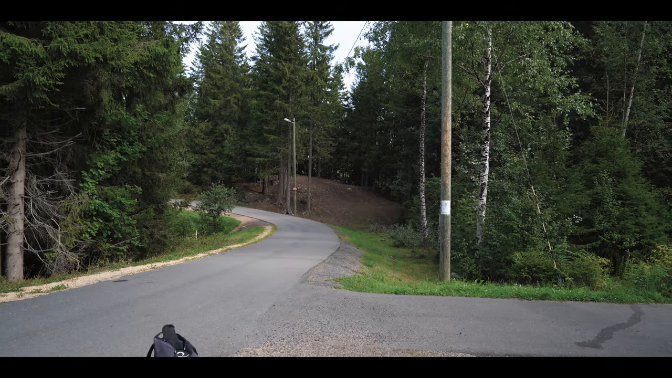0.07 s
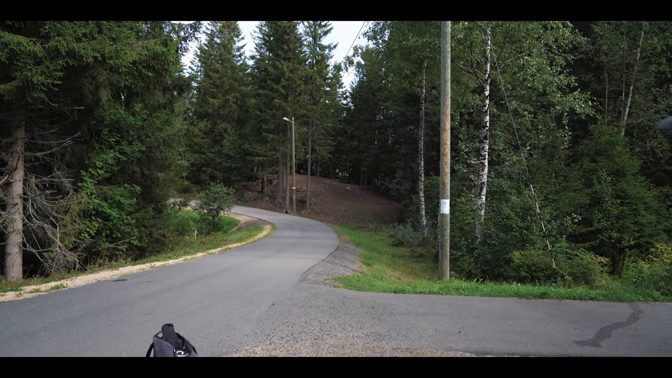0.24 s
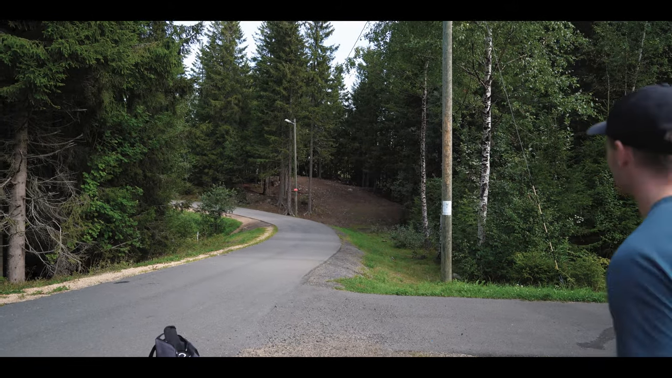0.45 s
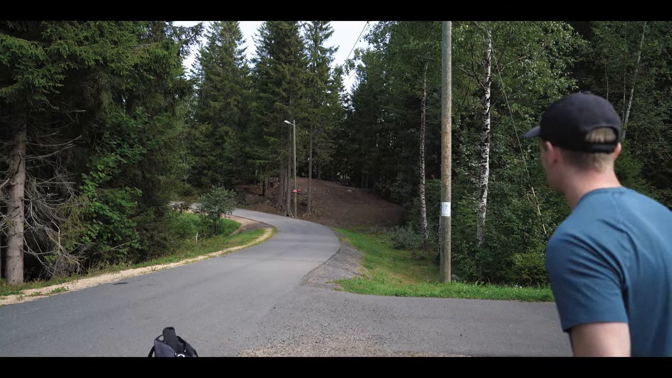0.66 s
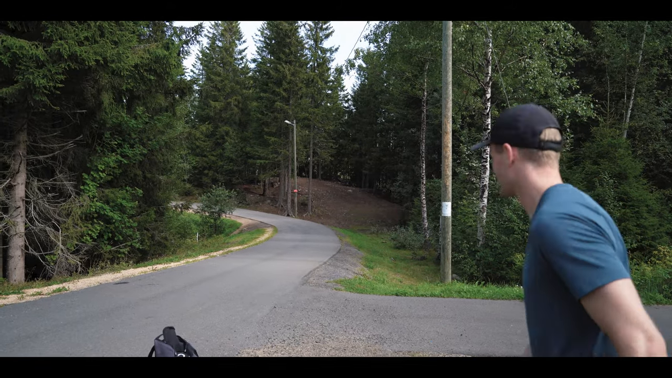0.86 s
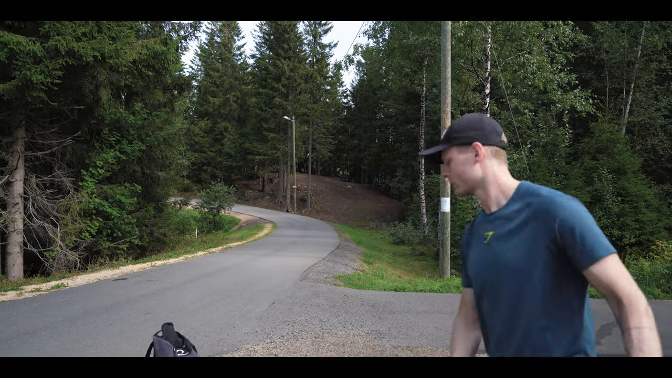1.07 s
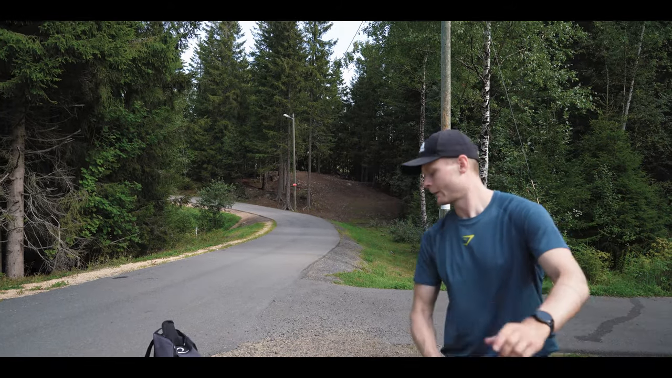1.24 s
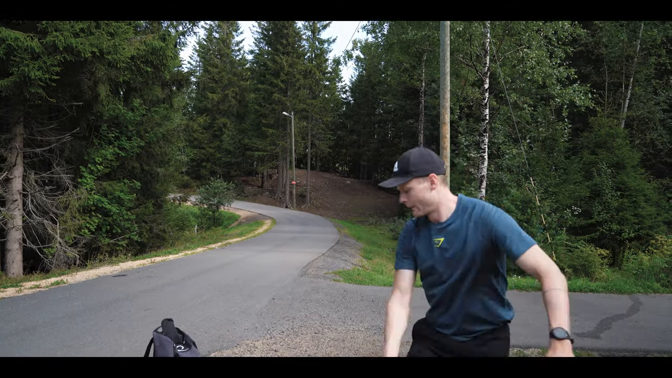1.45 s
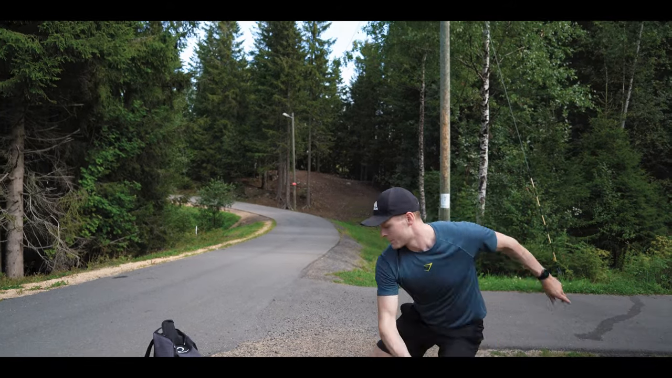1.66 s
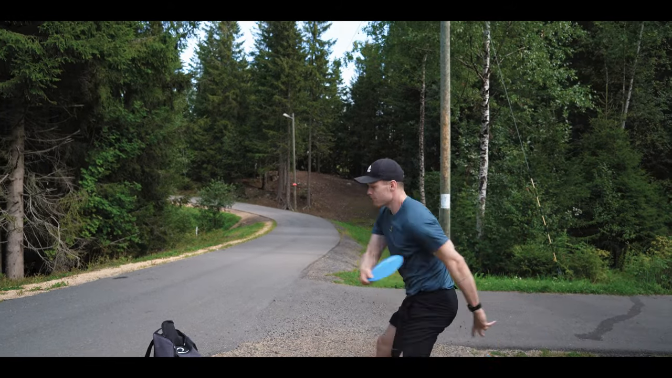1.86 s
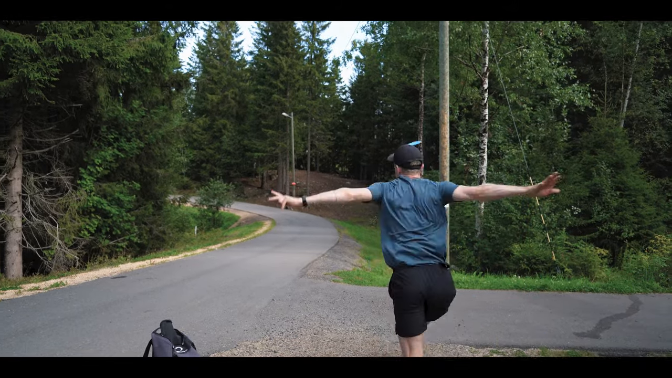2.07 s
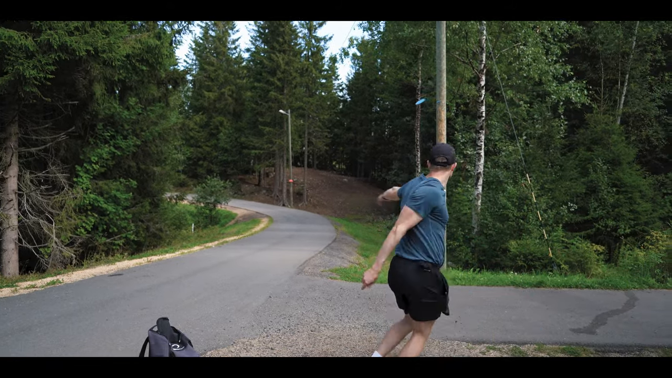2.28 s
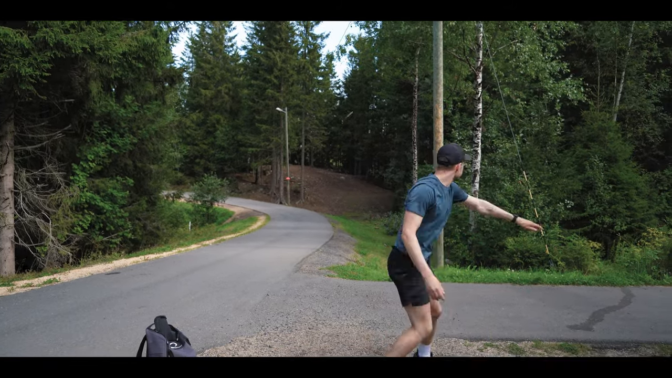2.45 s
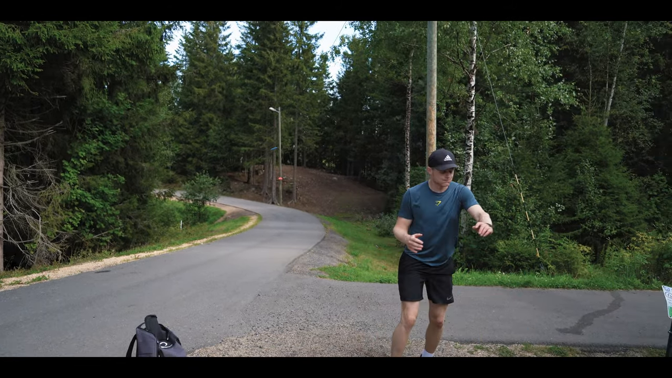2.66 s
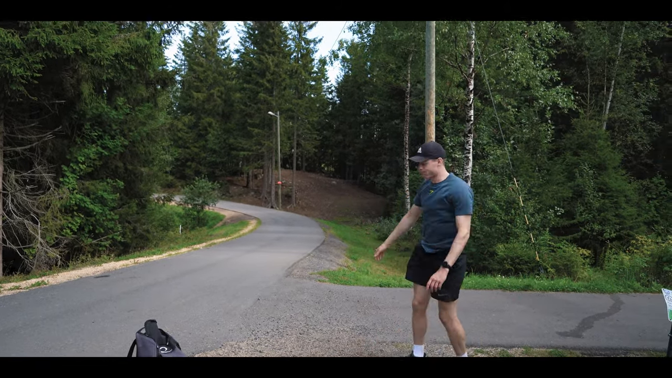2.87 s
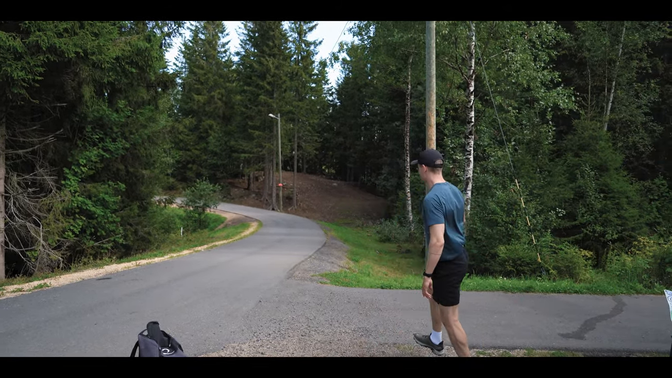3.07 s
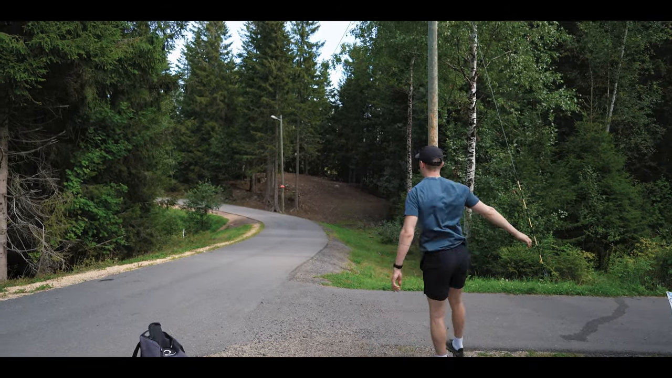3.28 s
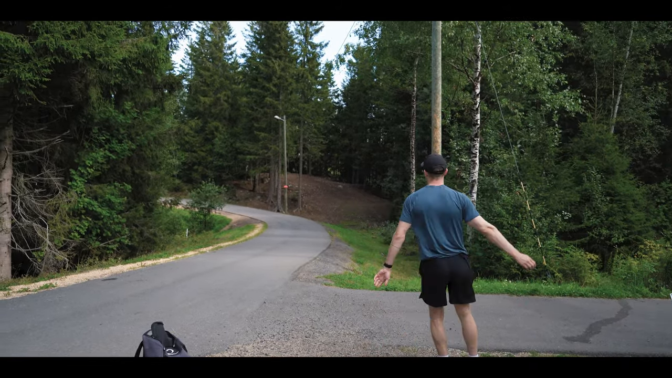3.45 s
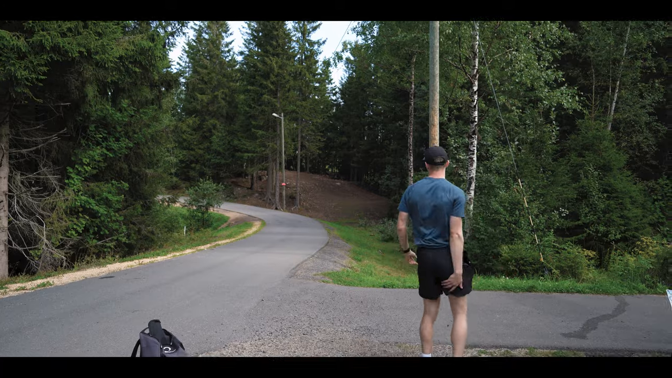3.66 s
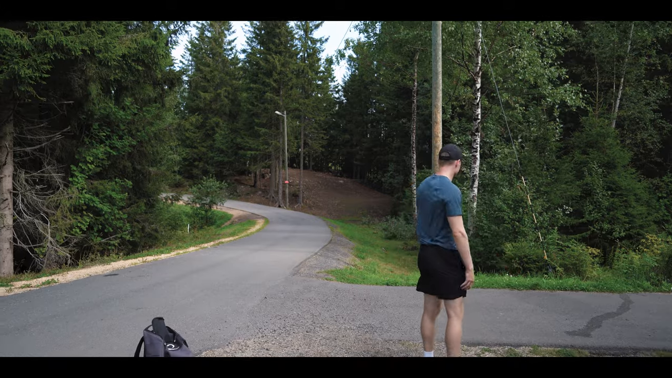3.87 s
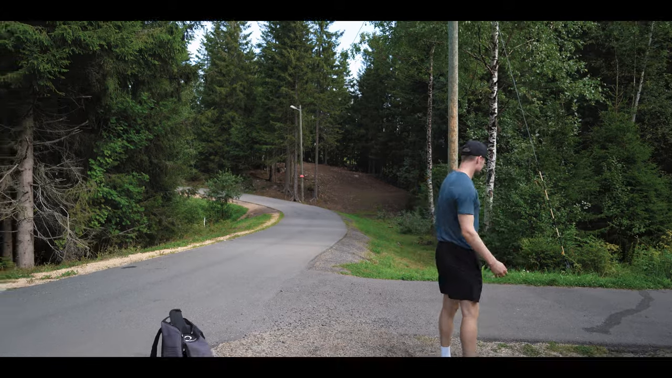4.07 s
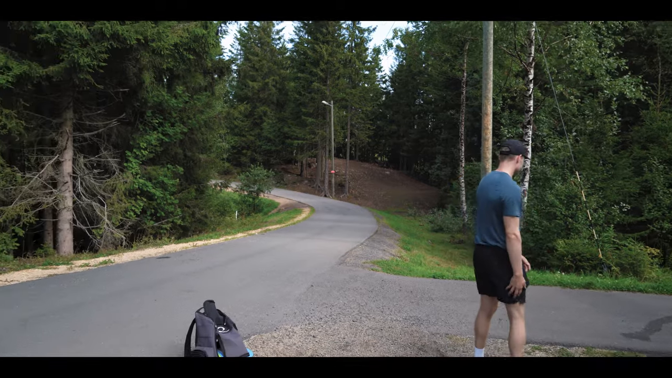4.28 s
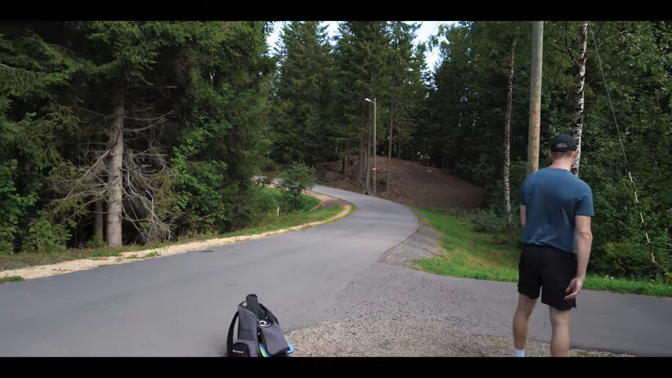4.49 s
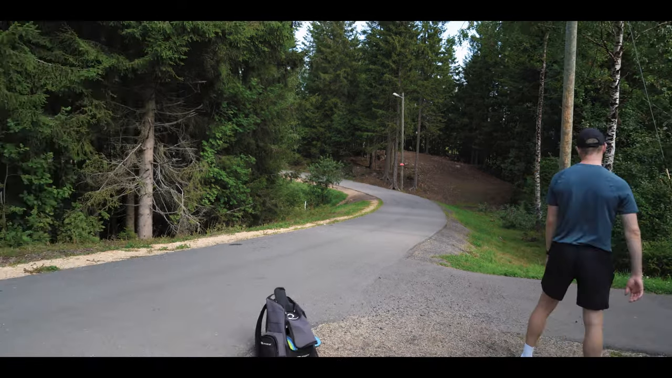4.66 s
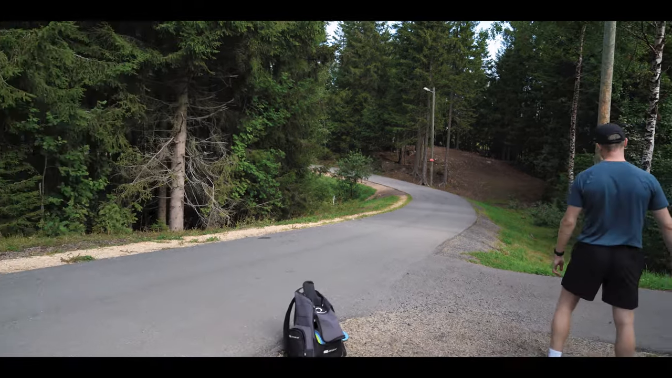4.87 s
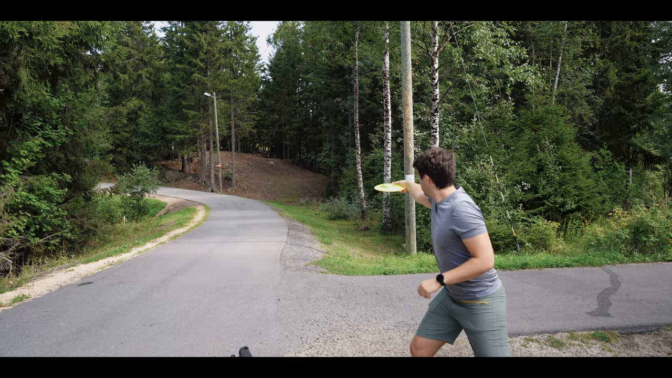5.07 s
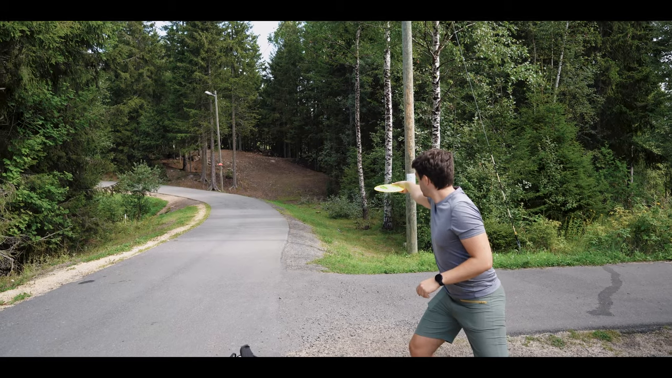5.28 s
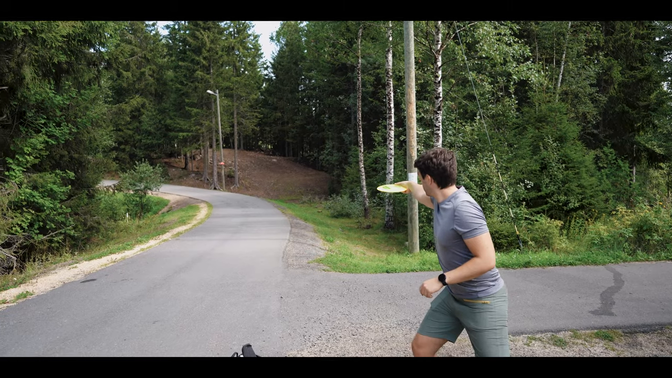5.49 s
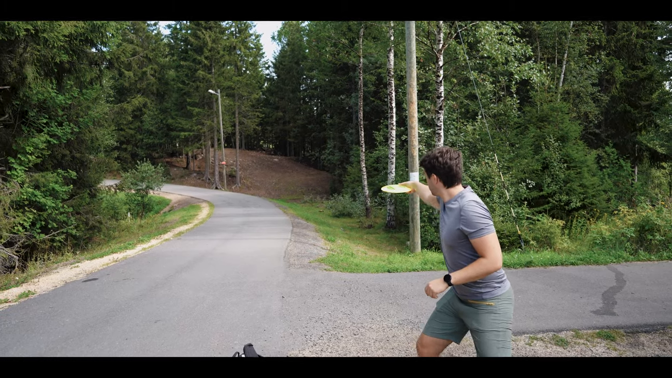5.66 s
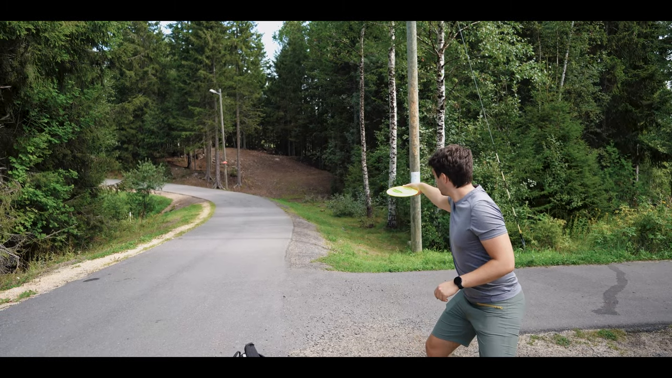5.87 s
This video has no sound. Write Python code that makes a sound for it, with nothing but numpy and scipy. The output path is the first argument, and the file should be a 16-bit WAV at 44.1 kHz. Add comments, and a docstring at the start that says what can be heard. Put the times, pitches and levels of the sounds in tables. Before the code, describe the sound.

Quiet outdoor air beside a forest and a faint falling bird whistle. A player's shoes scrape and grind loose grit, clothes swishing lightly, then a sharp slap-like crack bursts far above everything else and scatters into a short woodland reverberation. Afterwards irregular gravelly shuffles with small stone clicks slow to a halt, leaving soft air and thin, distant bird chirps. Near, dry perspective, no speech.

```python
"""Soles on gritty asphalt at a forest edge: a player steps into a disc throw, then shuffles to a stop.
Scuffs are random grain clicks under load curves, pebble pops and shoe knocks short rings, heel thuds
sagging low sines. The disc leaves with a sharp snap of ringing slaps and a noise crack; decaying noise
echoes it from the trees. Clothes swish as shaped grit; birds are gliding sines over a noise haze;
the still air is filtered noise."""
import sys
import numpy as np
from scipy import signal
from scipy.fft import rfft, irfft
from scipy.io import wavfile
from scipy.ndimage import uniform_filter1d

SR = 44100
rng = np.random.default_rng(int(sys.argv[2]) if len(sys.argv) > 2 else 0)


def put_to_file(sound):
    """Save the sound as 16-bit audio at rate SR, in the file named by the first command-line argument."""
    columns = np.atleast_2d(sound).T  # one column per channel
    safe = np.clip(columns, -1, 1)
    whole_steps = np.round(safe * 32767)
    wavfile.write(sys.argv[1], SR, whole_steps.astype(np.int16))


N = 261513
TIME = np.arange(N) / SR

# Feet landing on grit. Each row: peak time in seconds, crunch level in dB before trim,
# fade in seconds per 20 dB, sole body in dB relative to the crunch.
FOOTFALL_ROWS = [(1.436, -58, 0.02, -4), (1.809, -53.5, 0.06, 1.5), (1.897, -46.8, .07, 0),
                 (2.187, -53.5, .03, 3.5), (2.593, -45, 0.09, -5), (2.815, -43, 0.0377, -5),
                 (2.943, -53, 0.03, 0.5), (2.971, -50.5, .05, -8), (3.339, -58, 0.03, 4),
                 (3.386, -42, 0.03, -5.5), (3.798, -47.5, 0.0275, 1.5), (3.836, -50.5, .03, 2),
                 (3.975, -59.5, 0.03, 6.5), (4.286, -52, 0.05, 1.5)]
FOOTFALL_SAND_DB = -17  # relative to the crunch
LANDING_SHARE = 0.16  # rise time as a share of fade time
# A sole drags, then lifts. Each row: peak time in seconds, crunch level in dB before trim, rise and fade
# in seconds per 20 dB, sole body and sand fizz in dB relative to the crunch.
DRAG_ROWS = [(.6, -72, 0.44, .5, 1.5, -22), (1.2, -50.5, 0.08, 0.04, -3, -25),
             (1.236, -48, 0.056, .03, -4.5, -27), (1.462, -59.5, .05, 0, 2, -20),
             (1.955, -48.5, .07, 0.04, -3, -22), (2.02, -44.3, 0.1123, 0.1433, .5, -22),
             (2.121, -50, 0.0948, .06, 2.5, -14), (2.298, -57, .16, 0.35, 1.5, -16.5),
             (2.722, -47.5, 0.13, 0.025, 1, -15), (3.003, -49.5, 0.05, 0.06, -8, -12.5),
             (3.143, -56, 0.1, .021, 1, -18), (3.261, -54.5, 0.13, 0.07, -7, -11.5),
             (3.401, -43, 0.03, 0.01, -3.5, -16), (3.436, -52, 0.08, 0.02, -4, -18),
             (3.629, -44.5, 0.05, 0.0438, -1, -19.5), (3.699, -51, 0.07, 0.11, -2.5, -16),
             (3.78, -54.5, 0.03, .03, -3.5, -19), (4.025, -55, .055, 0.0344, 2.5, -13),
             (4.322, -55, 0.03, .02, -3, -22), (4.377, -50, 0.0547, 0.02, -3.5, -13),
             (4.44, -66, 0.14, .1, 1, -22)]
# Light weight shifts between steps. Each row: time in seconds, crunch level in dB before trim.
SHUFFLE_LEVEL = [(1.05, -87.5), (1.3, -66), (1.7, -66), (2.2, -70), (2.6, -63.5), (2.85, -64), (3.3, -72),
                 (3.75, -67), (3.95, -73.5), (4.15, -83), (4.45, -73), (5, -88)]
SHUFFLE_BODY_DB, SHUFFLE_SAND_DB = -6, -10  # relative to the crunch
# Sand sprays as the player spins on the planted foot; level before the sand trims.
PIVOT_S, PIVOT_WIDTH_S, PIVOT_DB = 2.006, 0.12, -58.5
SLOW_SAND_DB = 0.7  # slow steps crack more sand for the same load
# Sole body spectrum, also used by the disc flutter. Each row: frequency in Hz, relative dB per Hz.
BODY_SPECTRUM = [(60, -26), (160, -3.5), (260, -2), (420, 0.5), (600, -1.5), (850, -8.5), (1300, -25),
                 (3000, -60.5)]
# Crunch of crushed grains. Each row: frequency in Hz, relative dB per Hz.
CRUNCH_SPECTRUM = [(350, -30.5), (750, -6.5), (1100, 3), (1700, -1.5), (2700, -6.5), (3400, -4.8),
                   (4000, -4.8), (4800, -16.5), (7000, -27), (12000, -50)]
# Sand under the fast run-up. Each row: frequency in Hz, relative dB per Hz.
SPRAY_SPECTRUM = [(2500, -35), (4800, -4), (6000, -2), (8000, -1.5), (11000, -4.5), (13000, -8.5),
                  (16000, -16)]
# Sand under slow steps. Each row: frequency in Hz, relative dB per Hz.
FIZZ_SPECTRUM = [(2500, -35), (4800, -4), (6000, -2.5), (8000, -2.5), (11000, -4.5), (13000, -3.7),
                 (16000, -8)]

# Stones popping and shoe edges knocking, loud and faint. Each row: start in seconds,
# envelope peak in dB before chatter, ring in Hz, rise in cycles of the ring.
POP_ROWS = [(.524, -53.5, 2200, .5), (.574, -51, 1800, .5), (.7027, -45.5, 1200, .45),
            (.7035, -45, 450, .55), (1.185, -42, 6200, 1.2), (1.222, -33, 1700, .5), (1.231, -41, 1400, .6),
            (1.2365, -40, 1200, .6), (1.276, -48, 1300, .6), (1.317, -49, 1300, 1.2),
            (1.4925, -31.5, 2950, .6), (1.4939, -31.5, 940, .6), (1.4965, -36.5, 406, .6),
            (1.8055, -37, 320, .45), (1.8058, -43, 1800, .5), (1.816, -45, 9000, .6),
            (1.812, -41, 1000, .6), (1.824, -45, 1500, .6), (1.8955, -40, 1300, .5), (1.909, -40, 1200, .6),
            (1.934, -38, 700, .6), (1.98, -39, 1300, .6), (1.998, -37, 1600, .6), (2.014, -36, 500, .6),
            (2.027, -26, 750, .5), (2.0275, -33, 3700, 1.2), (2.041, -34, 550, .6), (2.059, -36, 620, .6),
            (2.128, -37, 1200, .6), (2.158, -42, 1100, .6), (2.1865, -44, 1110, .6),
            (2.589, -39, 3600, 1.2), (2.594, -41, 4300, 1), (2.598, -32, 3970, 1.8), (2.631, -41, 5800, .6),
            (2.6825, -39, 300, .35), (2.707, -36, 600, .4), (2.71, -42, 10000, 1), (2.711, -41, 200, .45),
            (2.72, -35, 1100, .6), (2.7235, -38, 700, .6), (2.8055, -40, 3600, 2),
            (2.8124, -31.5, 1150, .5), (2.814, -33, 1300, .6), (2.8157, -36, 3900, 1.2),
            (2.817, -33, 1000, .6), (2.828, -33, 3700, 2), (2.8345, -43, 3400, 3), (2.881, -46, 6000, .55),
            (2.882, -48, 328, .6), (2.943, -40.5, 1400, .6), (2.9695, -38, 2300, .6),
            (2.989, -38, 3500, 1.2), (2.997, -36, 2300, .8), (3.002, -37, 3400, 1.2),
            (3.0157, -30, 1230, .45), (3.041, -45, 12500, 1.2), (3.051, -45, 3500, 1.8),
            (3.088, -36, 2410, .65), (3.121, -45, 550, .6), (3.145, -41, 1100, .6), (3.162, -46, 4200, 1),
            (3.1755, -30, 12000, .8), (3.202, -34.5, 1490, .6), (3.2295, -30, 2840, .7),
            (3.269, -44, 2210, .6), (3.2745, -45, 8000, .6), (3.35, -42.5, 500, .6),
            (3.3815, -36, 1300, .6), (3.385, -39, 1900, .6), (3.3915, -32, 1150, .6),
            (3.401, -36.5, 950, .6), (3.4305, -35, 1497, .6), (3.4437, -42.5, 7500, .7),
            (3.4735, -42, 11000, .65), (3.518, -46, 9500, .8), (3.6135, -37, 1700, .6),
            (3.6223, -41, 10500, .6), (3.6245, -30.5, 746, .6), (3.629, -33, 2000, .6),
            (3.6339, -31, 1100, .5), (3.636, -32, 2000, .9), (3.65, -38, 1700, .6),
            (3.651, -45, 13000, 1.8), (3.674, -37, 600, .6), (3.6945, -40, 2100, .6),
            (3.7155, -42, 1600, .6), (3.77, -35, 1190, .5), (3.7954, -34, 1600, .9),
            (3.799, -34.5, 607, .9), (3.8332, -33, 1500, .6), (3.8436, -28, 1200, .45),
            (3.844, -32, 9700, .7), (3.855, -41, 2200, .6), (4.0283, -37.5, 1696, 1.1),
            (4.2878, -47, 3600, 1), (4.29, -40, 8040, .7), (4.299, -42, 900, .6), (4.304, -43, 3000, .6),
            (4.3047, -44, 469, .6), (4.373, -43, 1300, .6), (4.3785, -41, 900, .6), (4.3922, -34, 430, .6),
            (4.393, -35.5, 850, .6)]
TICK_DB, TICK_HZ, TICK_CYCLES = -7, 3400, 0.45  # hard edge that starts each lower-pitched pop
TICK_SOFT_DB_PER_OCTAVE = 3.5  # the sole muffles large stones: tick loss per octave of ring below TICK_HZ

# Weight landing. Each row: start in seconds, envelope peak in dB before judder, first pitch in Hz,
# rise in seconds.
THUD_ROWS = [(1.492, -50, 190, .01), (1.52, -57.5, 85.6, .022), (1.803, -43, 72, 0.022),
             (1.88, -48.5, 68, 0.037), (2.025, -44.5, 135, 0.02), (2.088, -47, 135, .017),
             (2.135, -50, 95.3, 0.026), (2.185, -53, 62, .02)]
THUD_SAG = 0.6  # final pitch as a share of the first

# Clothes sweeping past. Each row: peak time in seconds, level in dB, half width in seconds.
SWISH_ROWS = [(1.208, -63, 0.057), (1.45, -71.5, 0.056), (1.66, -73, .13), (2.01, -62, 0.11)]
# Cloth rub. Each row: frequency in Hz, relative dB per Hz.
CLOTH_SPECTRUM = [(800, -19.5), (2500, -5), (4200, 0), (7000, -2), (9000, -11), (16000, -24)]

# Quick slaps as the rim tears out of the fingers, bright and dull mixed, mostly lower towards the end.
# Each row: start in seconds, envelope peak in dB before the high-pass, ring in Hz, rise in milliseconds.
SLAP_ROWS = [(2.3622, -4.5, 1960, .98), (2.3622, -15.5, 750, 0.57), (2.3625, -22, 2300, 1.5),
             (2.363, -24, 3700, 1.1), (2.36393, -6, 1505, 1.12), (2.366, -9.5, 607, 0.63),
             (2.36787, -9.5, 1193, 0.87), (2.3695, -20, 800, 2.3), (2.3732, -16, 440, 3.2),
             (2.366, -27, 328, 6.5)]
SNAP_S = SLAP_ROWS[0][0]
# Crack of skin on plastic. Each row: frequency in Hz, relative dB per Hz.
CRACK_SPECTRUM = [(300, -40), (1500, -9), (2300, 0), (3000, 0), (4000, -2.5), (5000, -12), (6500, -16.5),
                  (8000, -24), (10000, -26), (16000, -36)]
GROUND_ECHO_S, GROUND_ECHO_DB = .0024, -2.5  # the asphalt throws the crack back

# Snap as it spreads into the trees. Each row: frequency in Hz, relative dB per Hz.
ECHO_SPECTRUM = [(60, -18), (170, -4), (300, 1), (450, 2.5), (700, 2), (1100, -0.5), (2000, -3),
                 (2700, -8.7), (3900, -8.7), (5200, -23), (8000, -31.5), (16000, -39)]
# Forest ring. Each row: frequency in Hz, 60 dB decay time in seconds.
FOREST_T60_S = [(150, 0.57), (450, .5), (900, .68), (2000, 0.63), (4000, .6), (14000, .62)]
# Late return from the far slope. Each row: frequency in Hz, relative dB per Hz.
HILL_SPECTRUM = [(200, -22), (500, -6), (800, 0), (1300, 0), (2000, -3), (2700, -14), (5000, -35)]
HILL_DELAY_S, HILL_WIDTH_S, HILL_DB = .35, .13, -54

# Nearer birds' notes. Each row: start in seconds, length in seconds, level in dB before the song trim,
# first, middle and last pitch in Hz.
BIRD_NOTES = [(1.348, .022, -64.5, 1670, 1760, 1740), (4.972, .04, -75, 3850, 4300, 3900),
              (5.003, .07, -75, 2750, 3130, 3150), (5.025, .05, -77, 2750, 2820, 2850),
              (5.11, .09, -79, 2900, 3000, 3050), (5.198, .022, -70, 4700, 3700, 2750),
              (5.218, .042, -78, 2750, 2560, 2650), (5.256, .048, -68.5, 2660, 3500, 4950),
              (5.345, .06, -73, 3800, 4120, 4020), (5.432, .03, -69.5, 2950, 3450, 3890),
              (5.455, .039, -69.5, 3900, 3350, 2600), (5.5, .19, -81, 3780, 3740, 3720),
              (5.56, .11, -82, 3020, 2990, 3000), (5.665, .045, -72, 3147, 3280, 3430),
              (5.68, .055, -75, 3000, 3000, 3020), (5.703, .05, -71.5, 3500, 3850, 3880),
              (5.78, .15, -80, 3850, 3830, 3780)]
# Quick twitter in mid-song; level before the song trim, range as a share of the centre pitch.
TWITTER_SPAN_S, TWITTER_PER_S, TWITTER_NOTE_S = (5.3, 5.42), 70, .02
TWITTER_DB, TWITTER_HZ, TWITTER_RANGE = -77.5, 4400, 0.2
# Falling whistle. Each row: time in seconds, pitch in Hz, level in dB.
WHISTLE_GLIDE = [(.74, 4250, -86), (.77, 4190, -75.5), (.84, 4070, -77), (.87, 3920, -82),
                 (.9, 3930, -77.5), (.955, 3850, -87), (1.0, 3400, -78), (1.06, 3160, -79),
                 (1.09, 3130, -88)]
# Far birds. Each row: frequency in Hz, relative dB per Hz.
CHORUS_SPECTRUM = [(1500, -45), (2500, -12), (3000, -1), (3800, 0), (4500, -4), (5400, -16), (7000, -45)]
CHORUS_S, CHORUS_WIDTH_S, CHORUS_DB = 5.45, .4, -84.5

# Outdoor air level. Each row: time in seconds, level in dB.
AIR_LEVEL_DB = [(0, -68.5), (.3, -67.5), (.5, -66.5), (1.05, -69), (4.15, -68.5), (4.5, -66.5), (4.93, -68),
                (5.05, -65)]
# Wash from the trees. Each row: frequency in Hz, relative dB per Hz.
AIR_SPECTRUM = [(20, -7), (70, -3), (120, -3), (220, 1.5), (400, 0.5), (560, -4), (850, -5.5),
                (1400, -11.5), (2400, -20.5), (3900, -19.5), (5400, -28.5), (8000, -31.5), (12500, -33),
                (16000, -44)]
# Low soft noise, mostly 200-450 Hz, swelling around 4.6 s. Each row: frequency in Hz, relative dB per Hz.
LOW_NOISE_SPECTRUM = [(80, -28), (150, -12), (220, 3), (300, 0), (420, -1.5), (650, -18), (1400, -13.5),
                      (2300, -18.5), (4000, -25), (6000, -45)]
LOW_NOISE_S, LOW_NOISE_WIDTH_S, LOW_NOISE_DB = 4.62, 0.26, -64.5

EDGE_HZ = 16050


def scuffs():
    """Grains crush under the loaded sole: they thump the rubber, crunch, and spray fine sand."""
    loads = []
    for s, db, fade_s, body_db in FOOTFALL_ROWS:
        loads.append((pressure(s, db, LANDING_SHARE * fade_s, fade_s), body_db, FOOTFALL_SAND_DB))
    for *stroke, body_db, sand_db in DRAG_ROWS:
        loads.append((pressure(*stroke), body_db, sand_db))
    shuffle = amp(np.interp(TIME, *np.transpose(SHUFFLE_LEVEL)))
    loads.append((shuffle, SHUFFLE_BODY_DB, SHUFFLE_SAND_DB))

    # loads add in power
    power = sum((amp([[body_db], [0], [sand_db]]) * load) ** 2 for load, body_db, sand_db in loads)
    body, crunch, fizz = np.sqrt(power)
    fizz = np.hypot(fizz, amp(PIVOT_DB) * swell(PIVOT_S, PIVOT_WIDTH_S))

    # the fast run-up grinds a dense stream; the slow steps afterwards crack fewer grains
    speed = np.interp(TIME, [2.4, 2.9], [1, 0])
    fast, slow = np.sqrt(speed), np.sqrt(1 - speed)
    fizz = fizz * amp(SLOW_SAND_DB * (1 - speed))
    stones = fast * grit(per_s=6500, spread_db=2.6, hiss=0.4, clump_db=1.3)
    stones = stones + slow * grit(per_s=2000, spread_db=3.5, hiss=0.45, clump_db=2.2)

    dense = grit(per_s=6000, spread_db=3.0, hiss=.6, clump_db=1.54)
    spray = coloured(evened(0.4 * stones + dense), SPRAY_SPECTRUM)
    sparse = grit(per_s=1100, spread_db=4.6, hiss=.5)
    # slow sand cracks in shifting patches of the treble
    ticks = coloured(mottled(evened(0.4 * stones + sparse)), FIZZ_SPECTRUM)
    sand = fast * spray + slow * ticks

    thump = amp(0.28) * coloured(body * stones, BODY_SPECTRUM)
    crush = amp(-0.8) * coloured(crunch * mottled(stones), CRUNCH_SPECTRUM)
    return thump + crush + amp(-.5) * fizz * sand


def pops_and_knocks(chatter_db=-9, chatter_s=.004):
    """Stones pop and shoe edges knock as short rings, each with a brief chatter (a short noise tail)."""
    t = TIME[:SR // 20]
    chatter = rng.standard_normal(len(t)) * blow(t, chatter_s / 2)
    rows = [pop(*row) for row in POP_ROWS]
    for s, db, hz, _ in POP_ROWS:
        if hz < TICK_HZ:
            tick_db = db + TICK_DB - TICK_SOFT_DB_PER_OCTAVE * np.log2(TICK_HZ / hz)
            rows.append(pop(s, tick_db, TICK_HZ, TICK_CYCLES))
    pops = knocks(rows)
    tail = signal.oaconvolve(pops, chatter / np.linalg.norm(chatter))[:N]
    return pops + amp(chatter_db) * tail


def pop(s, db, hz, cycles):
    """Knock row whose rise lasts a number of cycles, so higher rings tend to be shorter."""
    return s, db, hz, cycles / hz * 10 ** 3


def thuds(rough=.4):
    """Low pushes whose pitch sags as the foot settles; they judder from mid-pivot on."""
    out, t = np.zeros(N), TIME[:SR // 2]
    for s, db, first_hz, rise_s in THUD_ROWS:
        hz = first_hz * (THUD_SAG + (1 - THUD_SAG) * np.exp(-t / (2 * rise_s)))
        add(out, s, amp(db) * blow(t, rise_s) * tone(hz))
    judder = rough * (TIME > PIVOT_S)
    return out * (1 - judder / 2 + judder * drift(140))


def clothes(flutter_db=2.0):
    """Shirt and shorts swish as the player sweeps close by: fine grit with a fluttering level."""
    rub = grit(per_s=6000, spread_db=3, hiss=.7) * amp(flutter_db * drift(70))
    sweep = sum(amp(db) * swell(s, width_s) for s, db, width_s in SWISH_ROWS)
    return coloured(rub, CLOTH_SPECTRUM) * sweep


def snap(crack_db=2.5, crack_s=.0025, flutter_db=-34, flutter_s=.011, lowest_hz=165):
    """Slaps of the release, a bright crack of skin on plastic, and a short low flutter of the disc."""
    out, t = knocks(SLAP_ROWS), TIME[:SR // 5]
    crack, flutter = rng.standard_normal((2, len(t)))
    # flatten the spectrum, keep the random phases
    z = rfft(crack * np.exp(-t / crack_s))
    burst = irfft(z / abs(z)) * np.exp(-t / (2 * crack_s))
    crack = amp(crack_db) * coloured(burst, CRACK_SPECTRUM)
    add(out, SNAP_S, crack)
    add(out, SNAP_S + GROUND_ECHO_S, amp(GROUND_ECHO_DB) * crack)
    add(out, SNAP_S, amp(flutter_db) * coloured(flutter * blow(t, flutter_s), BODY_SPECTRUM))
    # a hand-sized disc radiates little bass
    return signal.sosfilt(signal.butter(2, lowest_hz, "highpass", fs=SR, output="sos"), out)


def forest(x, build_s=0.0097):
    """Trunks scatter sound back as dense echoes: noise that builds up, then decays per band."""
    taps = rng.standard_normal(SR) * (1 - np.exp(-(TIME[:SR] / build_s) ** 2))
    hz, t, z = signal.stft(taps, SR, nperseg=256)
    decay = amp(-60 * t / read(FOREST_T60_S, hz)[:, None])
    tail = signal.istft(z * decay, SR, nperseg=256)[1]
    return signal.oaconvolve(x, tail / np.linalg.norm(tail))[:N]


def hillside():
    """The far slope's return of the snap, late, dull and smeared: a swell of filtered noise."""
    smear = coloured(rng.standard_normal(N), HILL_SPECTRUM)
    return smear * amp(HILL_DB) * swell(SNAP_S + HILL_DELAY_S, HILL_WIDTH_S)


def birds(waver=.006):
    """Distant whistles: gliding sines with parabolic pitch, plus a twitter of random notes."""
    out = np.zeros(N)
    notes = list(BIRD_NOTES)
    for s, *tune in scattered(TWITTER_SPAN_S, TWITTER_PER_S):
        pitches_hz = TWITTER_HZ * (1 + TWITTER_RANGE * (2 * np.array(tune) - 1))
        notes.append((s, TWITTER_NOTE_S, TWITTER_DB, *pitches_hz))
    wobble = 1 + waver * drift(150)
    for s, length_s, db, *pitches_hz in notes:
        u = np.linspace(0, 1, int(length_s * SR))
        glide_hz = np.polyval(np.polyfit([0, .5, 1], pitches_hz, 2), u)
        hz = glide_hz * np.roll(wobble, -round(s * SR))[:len(u)]
        add(out, s, amp(db) * np.sin(np.pi * u) * tone(hz))
    return out


def whistle(waver=.005, flutter_db=2.5):
    """One bird's thin whistle: a sine falling in pitch, its level dipping between notes."""
    s, hz, db = np.transpose(WHISTLE_GLIDE)
    pitch_hz = np.interp(TIME, s, hz) * (1 + waver * drift(150))
    level = amp(np.interp(TIME, s, db) + flutter_db * drift(45))
    return level * (TIME > s[0]) * (TIME < s[-1]) * tone(pitch_hz)


def chorus(flutter_db=.7):
    """Birds deep in the forest, blurred into a faint haze of noise."""
    haze = coloured(rng.standard_normal(N), CHORUS_SPECTRUM)
    return haze * amp(CHORUS_DB + flutter_db * drift(22)) * swell(CHORUS_S, CHORUS_WIDTH_S)


def air(waver_db=0.97, rumble_db=-70.5, gust_db=1.8):
    """Soft wash from the trees, one swell of low soft noise and a lumpy rumble of moving air."""
    level_db = np.interp(TIME, *np.transpose(AIR_LEVEL_DB)) + waver_db * drift(7.2)
    wash = coloured(rng.standard_normal(N), AIR_SPECTRUM) * amp(level_db)
    low_noise = coloured(rng.standard_normal(N), LOW_NOISE_SPECTRUM)
    low_noise = low_noise * amp(LOW_NOISE_DB) * swell(LOW_NOISE_S, LOW_NOISE_WIDTH_S)
    rumble = coloured(rng.standard_normal(N), [(10, -10), (30, 0), (55, -6), (120, -28), (500, -70)])
    return wash + low_noise + rumble * amp(rumble_db + gust_db * drift(3.5))


def grit(per_s, spread_db, hiss, clump_db=2.5):
    """Clicks of many small and a few large grains over fine sand, levelled to steady running power."""
    size = amp(spread_db * np.minimum(rng.exponential(1, N), 5)) * rng.choice([-1, 1], N)
    clicks = evened(size * (rng.random(N) < per_s / SR)) + hiss * rng.standard_normal(N)
    # grains give way in clumps a few milliseconds long
    clicks = clicks * amp(clump_db * drift(320))
    return clicks / np.sqrt(abs(uniform_filter1d(clicks ** 2, size=900)) + 1e-9)


def mottled(x, patch_db=2.5):
    """Stones differ in size, so the resonances shift: random gain patches in time and frequency."""
    z = signal.stft(x, nperseg=256)[2]
    patches = uniform_filter1d(rng.standard_normal(z.shape), size=4, axis=0)
    patches = uniform_filter1d(patches, size=5, axis=1)
    return signal.istft(z * evened(amp(patch_db * evened(patches))), nperseg=256)[1][:N]


def pressure(s, db, rise_s, fade_s):
    """Load on a sole: rises to its peak and lets go, both at a steady rate in dB."""
    return amp(db - 20 * np.minimum(np.maximum((s - TIME) / rise_s, (TIME - s) / fade_s), 10))


def knocks(rows):
    """Short contacts, each ringing a few cycles at its own pitch."""
    out = np.zeros(N)
    for s, db, hz, rise_ms in rows:
        t = TIME[:SR // 10] + round(s * SR) / SR - s  # keeps sub-sample timing
        add(out, s, amp(db) * blow(t, rise_ms / 10 ** 3) * np.sin(2 * np.pi * hz * t))
    return out


def blow(t, rise_s):
    """Envelope of a soft contact: swells to 1 at the rise time, then dies."""
    k = np.maximum(t, 0) / rise_s
    return (k * np.exp(1 - k)) ** 2


def swell(s, width_s):
    """Smooth Gaussian rise and fall around a moment."""
    return np.exp(-((TIME - s) / width_s) ** 2)


def tone(hz):
    """Sine that follows a pitch curve."""
    return np.sin(2 * np.pi * np.cumsum(hz) / SR)


def drift(hz):
    """Random curve of rms 1 with hz knots per second."""
    knots = rng.standard_normal(N)
    return evened(np.interp(TIME * hz, np.arange(N), knots))


def scattered(span_s, per_s):
    """Irregular moments over a span, each with three random numbers from 0 to 1."""
    slots = np.arange(span_s[0], span_s[1], 1 / per_s)
    draws = rng.random((200, 4))
    return [(s + late / per_s, *rest) for s, (late, *rest) in zip(slots, draws)]


def coloured(x, spectrum, size=4096):
    """Minimum-phase filter of unit energy with the given spectrum."""
    log_gain = np.log(amp(read(spectrum, abs(np.fft.fftfreq(size, 1 / SR)))))
    taps = np.fft.ifft(np.exp(np.conj(signal.hilbert(log_gain)))).real[:size // 2]
    return signal.oaconvolve(x, taps / np.linalg.norm(taps))[:len(x)]


def read(points, hz):
    """Joins (Hz, value) points on a log-frequency axis."""
    f, value = np.transpose(points)
    return np.interp(np.log(hz + 1), np.log(f + 1), value)


def amp(db):
    """Decibels to gain."""
    return 10 ** (np.asarray(db) / 20)


def evened(x):
    """Scales to rms 1."""
    return x / np.sqrt(np.mean(x ** 2) + 1e-20)


def add(mix, s, sound):
    """Lays a sound into the mix at s seconds."""
    part = mix[round(s * SR):][:len(sound)]
    part += sound[:len(part)]


def scene(echo_db=-0.93):
    """Player near, with a faint forest echo; the snap and the nearer birds excite the trees more."""
    player = scuffs() + pops_and_knocks() + thuds() + clothes()
    song = birds()
    # heard from all directions at once, the slaps merge into one broad pulse
    outward = np.zeros(N)
    add(outward, SNAP_S, amp([echo_db]))
    echo = forest(amp(-20) * player + coloured(outward, ECHO_SPECTRUM) + amp(-3.0) * song)
    near = player + snap()
    far = echo + hillside() + amp(-2.5) * song + whistle() + chorus() + air()
    return (near + far)[None]


def record(dry):
    """Band limit: linear-phase low-pass at EDGE_HZ."""
    taps = signal.firwin(511, EDGE_HZ, window=("kaiser", 9), fs=SR)
    return signal.oaconvolve(dry, taps[None], "same")


dry = scene()
out = record(dry)
put_to_file(out)
```